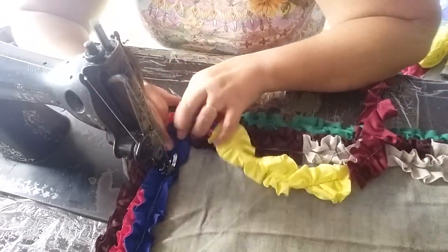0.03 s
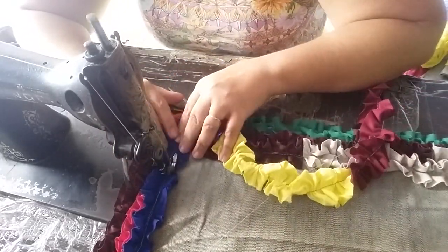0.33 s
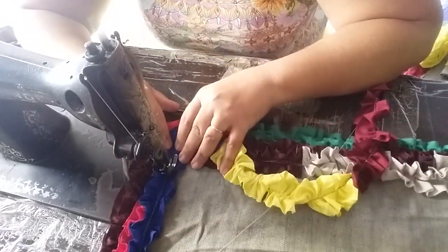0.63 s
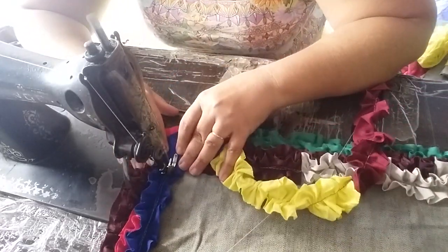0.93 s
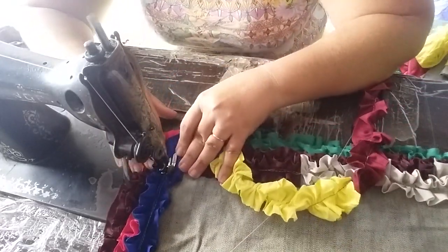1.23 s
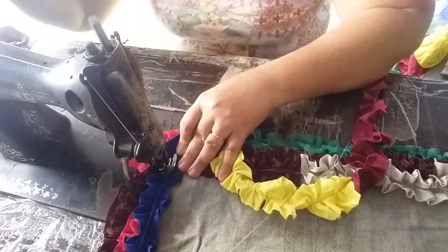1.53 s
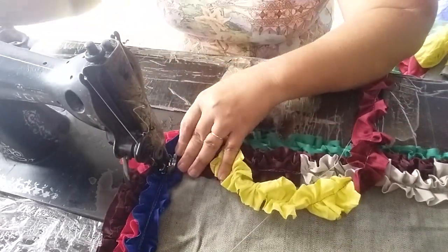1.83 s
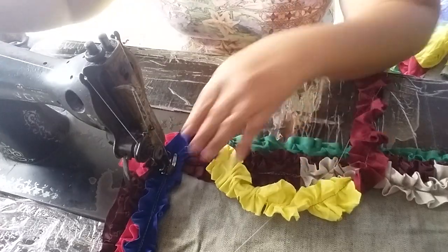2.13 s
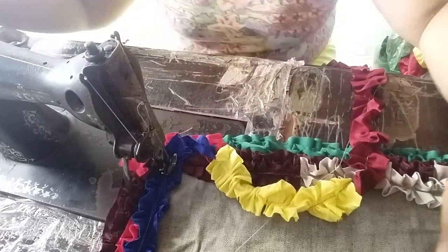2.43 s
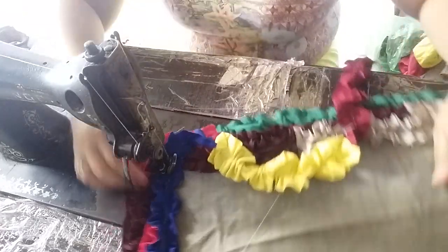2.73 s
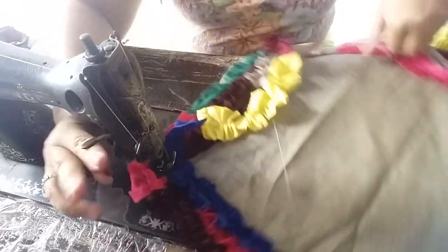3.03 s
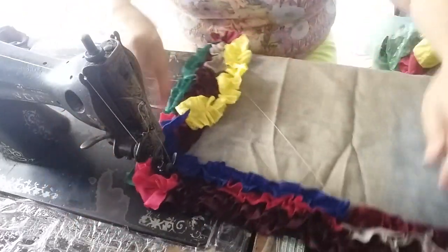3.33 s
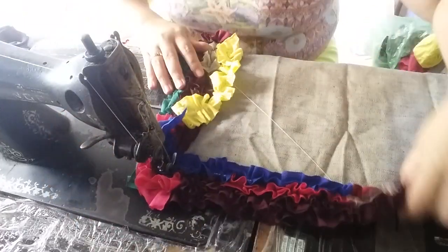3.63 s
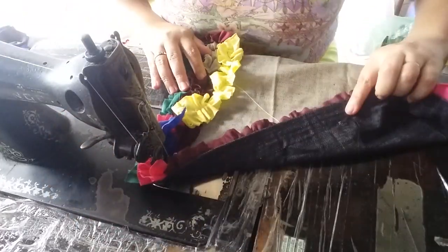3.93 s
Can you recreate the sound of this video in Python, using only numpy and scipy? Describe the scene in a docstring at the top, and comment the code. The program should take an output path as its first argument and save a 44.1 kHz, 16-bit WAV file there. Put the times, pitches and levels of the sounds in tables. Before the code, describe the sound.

An old sewing machine clatters through a short run, then cloth rustles and metal clicks.

```python
"""A thump, a click and a rustle of cloth: an old sewing machine, close to one microphone in a small room.
It spins up, sews thirteen stitches and coasts to rest. In each turn the shuttle clicks out and back,
the linkage knocks, loose parts rattle and the wooden table booms. Then the mechanism is nudged,
the cloth is pulled away and metal parts click, over a low steady rumble."""
import sys
import numpy as np
from scipy import signal
from scipy.fft import rfft, irfft
from scipy.io import wavfile
from scipy.ndimage import uniform_filter1d

SR = 44100
rng = np.random.default_rng(int(sys.argv[2]) if len(sys.argv) > 2 else 0)


def unload_wav(signal):
    """Save mono or channel-first audio to the path in sys.argv[1] as 16-bit WAV at rate SR, clipped to [-1, 1]."""
    wavfile.write(
        sys.argv[1],
        SR,
        np.round(np.clip(np.atleast_2d(signal).T, -1, 1) * 32767).astype(np.int16),
    )


N = 176400


def undb(db):
    """Decibels to gain."""
    return 10 ** (np.asarray(db) / 20)


def unit(x):
    """Scale to rms 1."""
    return x / np.sqrt(np.mean(x ** 2))


def clock():
    """Time of each sample in seconds."""
    return np.arange(N) / SR


def noise():
    """White noise."""
    return rng.standard_normal(N)


def through(x, response):
    """Pass a sound through an impulse response."""
    return signal.fftconvolve(x, response)[:N]


def colour(x, points, size=8192):
    """Causal filter from (frequency_hz, relative_db) points that keeps the power of white noise."""
    hz, db = np.array(points).T
    bins_hz = np.maximum(np.fft.rfftfreq(size, 1 / SR), 1)
    gain = undb(np.interp(np.log(bins_hz), np.log(hz), db))
    cepstrum = irfft(np.log(gain))
    cepstrum[1:size // 2] *= 2  # fold to minimum phase
    cepstrum[size // 2 + 1:] = 0
    response = irfft(np.exp(rfft(cepstrum)))
    return through(x, response / np.linalg.norm(response))


def ring(modes):
    """Impulse response of decaying modes (pitch_hz, level_db, t60_s)."""
    t = clock()[:SR // 2]
    return sum(undb(db) * np.cos(2 * np.pi * hz * t) * np.exp(-np.log(1000) * t / t60)
               for hz, db, t60 in modes)


def bursts(rows):
    """Chattering contacts (start_s, level_db, decay_s): a sudden start and an exponential fall."""
    t, power = clock()[:SR // 4], np.zeros(N + SR)
    for start, db, decay in rows:
        i = max(int(start * SR), 0)
        power[i:i + len(t)] += (undb(db) * np.exp(-t / decay)) ** 2
    return np.sqrt(power[:N]) * np.sign(noise())


def grains(per_s, spread_db):
    """Tiny impacts of uneven size at random moments."""
    impacts = (rng.random(N) < per_s / SR) * np.sign(noise())
    return unit(impacts * undb(spread_db * np.clip(noise(), -2, 2)))


# Background of the small room: frequency_hz, relative_db
ROOM_TONE_SPECTRUM = [(25, -29), (53, -17.5), (87, -7.5), (130, 0), (160, 2.5), (256, -5), (384, -7.5),
                      (500, -19), (750, -20), (1160, -24), (1940, -26.5), (3080, -31), (4500, -28.5),
                      (6210, -27.5), (7510, -36.5), (10500, -40), (16000, -40)]

def room_tone(level_db=-35):
    """The surroundings rumble steadily under a faint hiss."""
    return undb(level_db) * colour(noise(), ROOM_TONE_SPECTRUM)


# Swells of shaking in the stand: peak_s, half_width_s, level_db
SHUDDERS = [(.06, 0.22, -47), (.66, 0.12, -44)]
# The stand's deep resonance: frequency_hz, relative_db
STAND_SPECTRUM = [(20, -42), (42, -35), (56, 0), (75, -16), (120, -17), (300, -42), (1000, -56)]

def stand():
    """The stand shudders when the machine is set going."""
    t = clock()
    swell = sum(undb(db) * np.exp(-((t - peak) / half) ** 2) for peak, half, db in SHUDDERS)
    return colour(noise(), STAND_SPECTRUM) * swell


# Strokes of cloth and hands, close up: peak_s, rise_s, fall_s, level_db, drag_offset_db, hiss_offset_db
RUBS = [(0.034, 0.031, 0.048, -24.5, -0.5, -22), (.19, 0.067, .04, -35, -7, -22),
        (0.388, 0.015, 0.021, -20, -4.5, -20), (.62, 0.034, 0.035, -28.5, 0, -31),
        (2.07, 0.077, 0.12, -33.5, -7, -24), (2.455, 0.016, 0.022, -46, -5, -25),
        (2.86, 0.2, 0.27, -35, -11, -5), (3.04, 0.082, 0.082, -32, -12, -21),
        (3.2, 0.22, 0.29, -43, -3.5, -5), (3.8, 0.094, 0.085, -53, -4, -25),
        (3.98, 0.052, .1, -47.5, -21, -25)]
# Rustling fibres: frequency_hz, relative_db
CLOTH_SPECTRUM = [(200, -29.5), (800, -4.5), (2200, 1.5), (4000, 3), (5800, 8), (7300, 1), (9000, -13),
                  (16000, -17.5)]
# The cloth's weight dragging on the table: frequency_hz, relative_db
DRAG_SPECTRUM = [(40, 0), (130, -0.5), (280, 1.5), (450, 3.5), (720, 4), (1400, -7), (3000, -16),
                 (8000, -37)]
# Bright edge of cloth hiss and of metal ticks: frequency_hz, relative_db
EDGE_SPECTRUM = [(2000, -6), (6000, 4.5), (9000, -3), (13000, -12), (16000, -25)]

def cloth():
    """Fibres catch and slip as the cloth is pushed about; its weight rubs the table."""
    def fibres():
        return unit(grains(per_s=4000, spread_db=5) + undb(2) * noise())

    t, rub_power, drag_power, hiss_power = clock(), 0, 0, 0
    for peak, rise, fall, db, drag_db, hiss_db in RUBS:
        width = np.where(t < peak, rise, fall)
        power = (undb(db) * np.exp(-((t - peak) / width) ** 2)) ** 2
        rub_power += power
        drag_power += power * undb(drag_db) ** 2
        hiss_power += power * undb(hiss_db) ** 2
    rustle = colour(np.sqrt(rub_power) * fibres(), CLOTH_SPECTRUM)
    drag = colour(np.sqrt(drag_power) * noise(), DRAG_SPECTRUM)
    hiss = colour(np.sqrt(hiss_power) * fibres(), EDGE_SPECTRUM)
    return rustle + drag + hiss


# Metal parts touching near the microphone: start_s, level_db, decay_s, edge_offset_db
TICKS = [(0.024, -25.5, 0.013, -4), (0.127, -29.5, 0.011, -13), (0.182, -25, 0.0035, -25),
         (.19, -24.5, 0.0065, -18), (1.665, -21, 0.0065, -30), (1.761, -36, .003, -22),
         (1.794, -22.5, 0.0024, -39), (1.993, -29.5, 0.0033, -20), (2.014, -28, 0.011, -13),
         (2.05, -19, 0.013, -13), (2.103, -22, 0.0069, -20), (2.137, -25, 0.0097, -20),
         (2.172, -21, 0.0011, -28), (2.224, -33, 0.011, -7), (2.693, -17, 0.00067, -34),
         (2.865, -28, 0.0042, 2), (2.8843, -15, 0.004, -1), (2.987, -19, .003, -14),
         (3.179, -21.5, 0.0017, -8), (3.235, -23, 0.00091, -17), (3.431, -25.5, 0.0014, -15),
         (3.453, -26.5, 0.002, -8)]
# Body of a tick: frequency_hz, relative_db
TICK_SPECTRUM = [(200, -4), (900, -3), (2400, -1), (4000, 1.5), (5000, 5), (6300, 5.5), (7500, -5.5),
                 (11000, -25.5), (16000, -74)]

def ticks():
    """Single metal clicks; the harder ones have a bright edge."""
    body = bursts([(start, db, decay) for start, db, decay, _ in TICKS])
    crack = bursts([(start, db + edge_db, decay) for start, db, decay, edge_db in TICKS])
    return colour(body, TICK_SPECTRUM) + colour(crack, EDGE_SPECTRUM)


# Modes of the machine's steel parts: pitch_hz, relative_db, t60_s
STEEL_MODES = [(2142, -7, .14), (2927, -1, .16), (3226, -3, .12), (3520, -4, .08), (3914, -4, .12),
               (4229, -3, .1), (4468, -2, .14), (5006, -2, .14), (5339, -1, .14), (5614, 0, .1),
               (6120, -1, .1), (6653, -1, .12)]

def steel(contacts, ring_db=-18.5):
    """The steel parts ring on after every contact."""
    response = ring(STEEL_MODES)
    return contacts + undb(ring_db) * through(contacts, response / np.linalg.norm(response))


# Modes of the wooden table under the machine: pitch_hz, relative_db, t60_s
TABLE_MODES = [(122, -27, 0.15), (150.8, 0, 0.25), (171, -4, 0.14), (272.8, 7, 0.14), (318, -32, 0.13),
               (358, -20, 0.034), (499.5, -11.5, 0.4), (794, -9, 0.059)]
# Thumps on the table: start_s, upper_modes_db, deep_modes_db
THUMPS = [(.031, -1.5, -1), (.07, -4, -27), (0.177, -14.5, -11), (0.248, -9, -18), (0.384, -2, -5.5),
          (0.464, -4.5, -3.5), (.51, -4.5, -16), (0.586, -7, -12), (0.621, -6.5, -20), (0.67, -5.5, -12),
          (0.708, -3.5, -8), (0.769, -14, -15), (0.857, -6, -22), (0.903, -5.5, -16), (0.978, -1.5, -27),
          (1.04, -18, -3.5), (1.127, -4.5, -2.5), (1.181, -2, -29), (1.253, -1.5, -8), (1.29, -5.5, -12),
          (1.374, -3.5, -22), (1.519, -9.5, -24), (1.574, -15, -19), (1.68, -13.5, -13)]

def table(base_db=-16.5, push_s=0.0039, deep_below_hz=220):
    """The table booms as the machine works through thick cloth."""
    out = np.zeros(N + SR)
    push = 1 - np.exp(-clock()[:SR // 2] / push_s)
    for start, upper_db, deep_db in THUMPS:
        modes = [(hz, base_db + db + (deep_db if hz < deep_below_hz else upper_db), t60)
                 for hz, db, t60 in TABLE_MODES]
        i = int(start * SR)
        out[i:i + len(push)] += push * ring(modes)
    return out[:N]


# Strength of the rattle as the machine speeds up and slows: time_s, level_db
RATTLE_LEVELS = [(.225, -43), (.24, -21), (.3, -22.5), (.4, -18), (.56, -19), (.75, -17), (.95, -16),
                 (1.15, -18), (1.32, -17.5), (1.41, -21.5), (1.46, -22), (1.51, -25.5), (1.56, -25.5),
                 (1.63, -21), (1.67, -33.5), (1.72, -40.5), (1.78, -39)]
# Rattle within one turn of the shaft: phase_turns, offset_db
RATTLE_CYCLE = [(0, -8), (.04, 0), (.1, 1), (.17, -1.5), (.27, -1.5), (.35, -1), (.385, -7), (.43, -8),
                (.47, .5), (.62, 0), (.68, -.5), (.77, 1.5), (.83, -3), (.92, -6), (1, -8)]
# Loose parts heard close up: frequency_hz, relative_db
RATTLE_SPECTRUM = [(40, -27), (70, -22), (130, -4), (400, 0.5), (600, -4), (1000, -4.5), (2400, -3.5),
                   (3000, -1.5), (4500, 1.5), (5900, 4.5), (7000, 0), (8300, -7), (11000, -16),
                   (16000, -22)]

def rattle(contact_decay_s=0.0039, chink_db=-6.5):
    """Loose parts chatter and chink, swelling and dipping with each turn of the shaft."""
    t = clock()
    phase_turns = np.interp(t, *shaft()) % 1
    drive_db = np.interp(t, *np.array(RATTLE_LEVELS).T, left=-100, right=-100)
    cycle_db = np.interp(phase_turns, *np.array(RATTLE_CYCLE).T)
    impacts = grains(per_s=1300, spread_db=-2)
    power = through(impacts ** 2, np.exp(-t[:SR // 20] / contact_decay_s))
    chatter = unit(np.sqrt(np.abs(power)) * noise())
    loose_parts = unit(chatter + undb(chink_db) * chinks())
    return colour(undb(drive_db + cycle_db) * loose_parts, RATTLE_SPECTRUM)


def chinks(count=7000, low_hz=500, high_hz=11000, t60_s=.024):
    """Loose parts touch at random, each ringing for a moment at its own pitch."""
    t, out = clock()[:SR // 25], np.zeros(N + SR)
    fade = np.exp(-np.log(1000) * t / t60_s)
    for when, pitch, size in rng.random((count, 3)):
        i = int(when * N)
        hz = low_hz + pitch * (high_hz - low_hz)
        out[i:i + len(t)] += size ** 2 * fade * np.sin(2 * np.pi * hz * t)
    return unit(out[:N])


# One stitch per turn of the shaft: out_s, back_s, out_offset_db, back_offset_db, knock_offset_db
STITCHES = [(.2377, .3136, -9, -9, -3), (.3904, .4448, -7, -1, 1), (.5091, .5575, -1, -1, 0),
            (.6144, .6583, 0, 0, 0), (.7142, .7551, -1, -2, 1), (.8055, .8429, 0, 0, 1),
            (.8918, .9297, 0, 2, 1), (.9796, 1.0195, 0, 0, 1), (1.0709, 1.1133, -1, 1, -1),
            (1.1676, 1.2125, -1, -1, 3), (1.2719, 1.3178, -2, 1, -1), (1.3811, 1.437, -4, -1, -11),
            (1.5268, 1.616, -5, -10, -10)]
# The shuttle's sharp click: frequency_hz, relative_db
SHUTTLE_SPECTRUM = [(200, -22), (1500, -19), (3200, -14), (4900, -11), (5700, 1), (6200, -3), (6800, -9),
                    (8000, -11), (11000, -15.5), (14500, -20), (16000, -27)]

def shuttle(base_db=-6.3, decay_s=.0023):
    """The shuttle clicks once going out and once coming back."""
    clicks = bursts([(start, base_db + db, decay_s) for start, db in shuttle_strokes()])
    return colour(clicks, SHUTTLE_SPECTRUM)


def shuttle_strokes():
    """Every stroke, out and back, as (start_s, offset_db)."""
    return [stroke for stitch in STITCHES for stroke in zip(stitch[:2], stitch[2:4])]


def shaft(back_turns=.43, rest_s=1.76):
    """Moments of the shuttle strokes and the final stop, and the turns of the shaft done by then."""
    times = np.append(np.array(STITCHES)[:, :2], rest_s)
    turns = np.append([(k, k + back_turns) for k in range(len(STITCHES))], len(STITCHES))
    return times, turns


def once_a_turn(phase_turns):
    """Moments at which the shaft passes a given share of its turn."""
    times, turns = shaft()
    return np.interp(np.arange(len(STITCHES)) + phase_turns, turns, times)


def clinks(low_hz=2900, high_hz=7000, base_db=-28, t60_s=.07):
    """Each shuttle click also rings a loose steel part, never quite the same one."""
    out = np.zeros(N + SR)
    for start, db in shuttle_strokes():
        clink = ring([(hz, base_db + db, t60_s) for hz in rng.uniform(low_hz, high_hz, 3)])
        i = int(start * SR)
        out[i:i + len(clink)] += clink
    return out[:N]


# The linkage's hard knock: frequency_hz, relative_db
LINKAGE_SPECTRUM = [(200, -41), (700, -19), (1200, -4), (2500, -8), (3600, -0.5), (6200, 0.5), (8000, -11),
                    (11000, -20), (16000, -35)]

def linkage(phase_turns=.303, base_db=-9.3, decay_s=.0043):
    """The linkage knocks once a turn, between the two shuttle clicks."""
    knocks = [(start, base_db + knock_db, decay_s)
              for start, (*_, knock_db) in zip(once_a_turn(phase_turns), STITCHES)]
    return colour(bursts(knocks), LINKAGE_SPECTRUM)


# The feed stroke heard through the table: frequency_hz, relative_db
FEED_SPECTRUM = [(40, -19), (100, -13), (155, 10), (220, -7), (490, 10), (700, -34), (3000, -55)]

def feed(phase_turns=0.58, base_db=-33.5, decay_s=0.042):
    """The feed stroke drums on the table once a turn; its level follows the outward shuttle click."""
    strokes = [(start, base_db + out_db, decay_s)
               for start, (_, _, out_db, _, _) in zip(once_a_turn(phase_turns), STITCHES)]
    return colour(bursts(strokes), FEED_SPECTRUM)


# Faint squeaks after the machine has stopped: start_s, length_s, pitch_hz, level_db
SQUEAKS = [(1.943, 0.056, 5700, -40.5), (2.36, 0.046, 5520, -37.5), (2.367, .025, 5020, -47),
           (2.402, .035, 5540, -40)]

def squeaks(waver_hz=110):
    """Thin tones swell and fade, their pitch unsteady."""
    t, out = clock(), 0
    for start, length, hz, db in SQUEAKS:
        pitch_hz = hz + waver_hz * unit(uniform_filter1d(noise(), size=100))
        swell = np.sin(np.pi * np.clip((t - start) / length, 0, 1))
        out += undb(db) * swell * np.sin(2 * np.pi * np.cumsum(pitch_hz) / SR)
    return out


# Hollow scrape of the cloth swung over the machine's bed: time_s, resonance_hz, level_db
SCRAPE_PATH = [(2.651, 1000, -59), (2.851, 943, -46), (3.0, 1100, -44), (3.079, 1262, -41.5),
               (3.152, 886, -52), (3.268, 687, -49), (3.45, 580, -62)]

def scrape(half_width_hz=260):
    """Friction noise in one broad resonance that sinks as the cloth slows."""
    t = clock()
    times, hz, db = np.array(SCRAPE_PATH).T
    band = unit(signal.sosfilt(signal.butter(2, half_width_hz, fs=SR, output="sos"), noise()))
    carrier = np.sin(2 * np.pi * np.cumsum(np.interp(t, times, hz)) / SR)
    return unit(band * carrier) * undb(np.interp(t, times, db, left=-100, right=-100))


def room(x, gap_s=0.0013, t60_s=0.081, echo_db=-2):
    """A short, diffuse echo from close walls follows the direct sound to the microphone."""
    t = clock()
    reflections = colour(noise(), [(100, 12), (6000, -27), (10000, -1), (16000, 5.5)])
    tail = reflections * (t > gap_s) * np.exp(-np.log(1000) * t / t60_s)
    return x + undb(echo_db) * through(x, tail / np.linalg.norm(tail))


def scene():
    """Machine, cloth and small clicks, close up and in mono, over the rumble of the room."""
    contacts = shuttle() + linkage() + rattle() + clinks() + ticks()
    near = steel(contacts) + cloth() + scrape() + squeaks()
    return (room(near) + table() + feed() + stand() + room_tone())[None]


def record(dry, low_cut_hz=39.3, top_hz=16000):
    """The recorder thins the deepest bass, rounds the loudest peaks and cuts the top."""
    thinned = signal.sosfilt(signal.butter(2, low_cut_hz, "high", fs=SR, output="sos"), dry)
    rounded = .95 * thinned / (1 + thinned ** 4) ** (1 / 4)
    return signal.sosfilt(signal.ellip(10, .2, 80, top_hz, fs=SR, output="sos"), rounded)


dry = scene()
out = record(dry)
unload_wav(out)
```